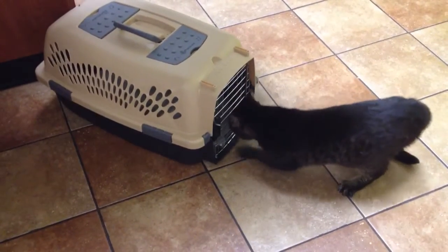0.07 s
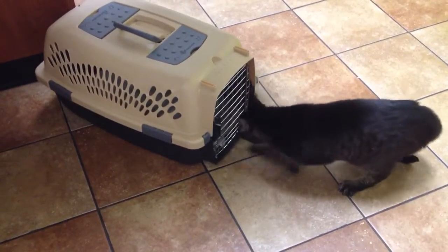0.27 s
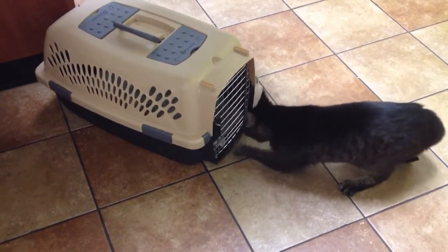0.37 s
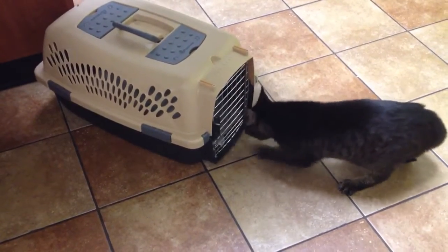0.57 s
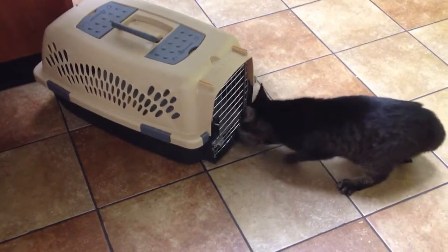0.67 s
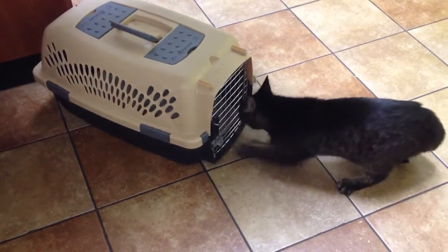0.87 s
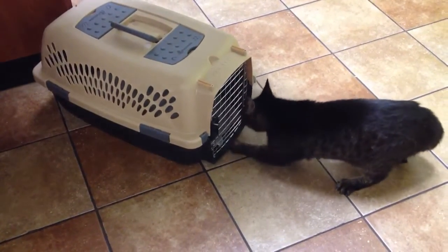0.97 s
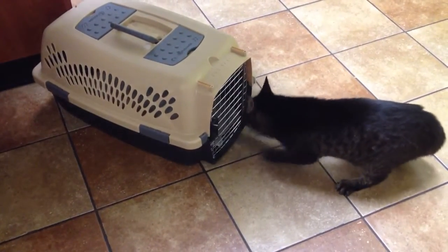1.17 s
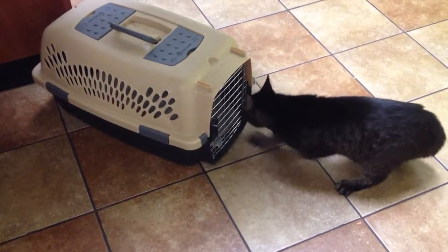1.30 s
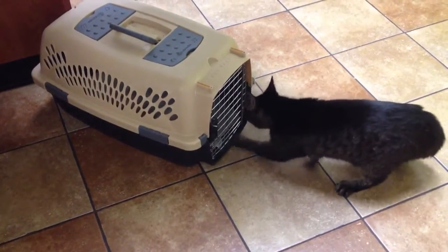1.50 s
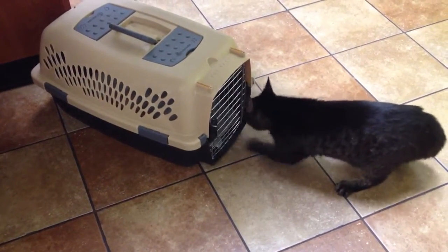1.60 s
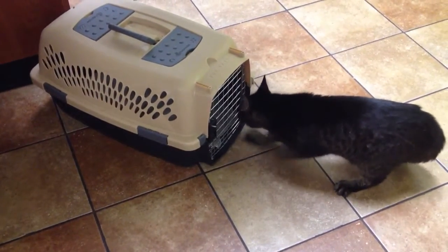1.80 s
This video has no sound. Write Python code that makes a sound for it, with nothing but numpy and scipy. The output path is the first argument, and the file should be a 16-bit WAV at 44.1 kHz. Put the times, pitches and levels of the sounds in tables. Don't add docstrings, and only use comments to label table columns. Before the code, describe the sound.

A cat nudges a carrier's wire door, making sharp metallic clacks with hollow plastic thumps in a tiled room

```python
import sys
import numpy as np
from scipy import signal
from scipy.io import wavfile

SR = 44100
rng = np.random.default_rng(int(sys.argv[2]) if len(sys.argv) > 2 else 0)


def master_out(mix):
    frames = np.transpose(np.atleast_2d(mix))
    ceiling = np.clip(frames, -1, 1)
    pcm = np.round(ceiling * 32767).astype(np.int16)
    wavfile.write(sys.argv[1], SR, pcm)


def rack_gain(trim_db):
    fader = np.asarray(trim_db, float)
    return 10 ** (fader / 20)


N = 81585
LEAD = 4410

# start_s, latch_db, frame_db, shell_db, wires_db
DOOR_KNOCKS = [(0.1407, -29.5, -47.5, -44, -37.5), (0.2001, -24.5, -48, -47, -45),
               (0.2045, -41, -41.5, -43, -42.5), (0.2421, -10, -23, -33.5, -32.5),
               (0.3254, -64, -38.5, -46.5, -53.5), (0.3955, -63, -41.5, -48, -72),
               (0.7854, -33, -40.5, -63, -53), (0.8381, -23.5, -30, -39, -43),
               (0.8466, -51, -43, -37.5, -65), (1.2804, -28, -34.5, -48, -41.5),
               (1.2897, -30, -39.5, -43, -38), (1.722, -24, -37, -44.5, -41)]
# latch_db, frame_db, shell_db, wires_db
EARLIER_KNOCK_DB = (-39, -37, -47.5, -48)
EARLIER_KNOCK_S = -0.012
# start_s, latch_db, frame_db, shell_db, wires_db
RATTLE_RUNS = [
    (.141, -46, -73, -61, -57),
    (.62, -53, -67, -69.5, -70),
    (1.172, -64, -73, -55.5, -68.5),
    (1.192, -48, -57, -54, -61.5),
    (1.292, -36, -45.5, -53.5, -49.5),
    (1.453, -49, -58.5, -70, -68),
    (1.678, -65, -63.5, -65, -70),
]
RATTLE_LENGTH_S = [0.016, .012, 0.013, .03, 0.022, 0.014, 0.017]
# start_s, level_db
BASE_THUMPS = [
    (0.148, -52),
    (.262, -40),
    (0.851, -55),
    (1.311, -47),
    (1.73, -52),
]
KNOCK_FACING_DB = [-6, -7, -5.5, -1, 1.5, -18, -1.5, -3, -2, -5, -4.5, -9]
KNOCK_BARS_DB = [-15, -11, -15, -15, -8, -10, -13, -17, -4, -6, -5.5, -4.5]
RATTLE_FACING_DB, RATTLE_BARS_DB = -6, -8

# pitch_hz, width_hz, level_db
LATCH_MODES = [(1740, 700, -10), (2156, 472, 0.5)]
# pitch_hz, width_hz, level_db
BAR_MODES = [(2570, 430, -4), (3040, 430, -1), (3645, 496, 0.5)]
# pitch_hz, width_hz, level_db
FRAME_MODES = [(605, 130, -11), (811, 147, -8), (980, 470, -23), (1458, 366, -1.5)]
# pitch_hz, width_hz, level_db
WIRE_MODES = [(4950, 620, -3.5), (5700, 620, -2), (6580, 525, -2), (7540, 560, 0), (8400, 760, 1.5),
              (11060, 910, -2.5), (11700, 630, -38), (12060, 960, 2.5), (13300, 700, -6),
              (14400, 370, -9.5)]
# pitch_hz, width_hz, level_db
SHELL_MODES = [(210, 63, -10.5), (250.7, 21.9, -2), (326.8, 26.6, -3.5), (465, 110, -3.5)]
# pitch_hz, width_hz, level_db
BASE_MODES = [(126, 25, -2.5), (163.2, 31, -1.5), (204.4, 75, -5)]
LATCH_DB, FRAME_DB, WIRES_DB, SHELL_DB = -5, 4, -0.5, 1
CONTACT_S, WIRES_CONTACT_S, SHELL_LAG_S = 0.0012, 0.004, 0.004964
SPREAD_DB = 4.5
METAL_BLUR = 1.85

# pitch_hz, t60_s
ROOM_DECAY = [(100, .5), (300, 0.3354), (1000, 0.387), (3000, 0.39), (8000, 0.36), (15000, 0.27)]
# pitch_hz, level_db
ROOM_LEVEL = [(100, -25.5), (300, -32.5), (1000, -26), (2500, -30), (5000, -31.5), (8000, -27.5),
              (15000, -33.5)]
# pitch_hz, width_hz, level_db
HUM_MODES = [(125.5, 6.7, 0.5), (158.7, 60, 8), (221.4, 60, -10.5), (239, 9.2, 0.5), (304, 60, -13),
             (414, 10, 13.5)]
# pitch_hz, density_db
HISS_SPECTRUM = [(52, 4), (100, -6), (160, 0.5), (400, -6.5), (900, -19), (2500, -16.5), (5000, -29.5),
                 (15000, -26.5)]

PORT_HZ = [7940, 9930, 12300, 15700]
PORT_WIDTH_HZ = [1630, 2950, 1500, 1990]
PORT_GAIN = [1.08, 0.086, 0.23, 0.62]


def ring(x, hz, width_hz):
    radius = np.exp(-np.pi * width_hz / SR)
    angle = 2 * np.pi * hz / SR
    return signal.lfilter([0, np.sin(angle)], [1, -2 * radius * np.cos(angle), radius ** 2], x + 1e-18)


def strike(modes, times_s, levels_db, blur, contact_s, direct_db):
    shape = len(times_s), len(modes)
    delay_s = contact_s * rng.random(shape)
    scatter_db = SPREAD_DB * rng.standard_normal(shape)
    out = np.zeros((2, N + LEAD + 900))
    for m, (hz, width_hz, mode_db) in enumerate(modes):
        force = np.zeros_like(out)
        gain = rack_gain(levels_db + mode_db)
        direct_at = ((times_s + delay_s[:, m]) * SR).astype(int) + LEAD
        around_at = (times_s * SR).astype(int) + LEAD
        np.add.at(force[0], direct_at, gain * rack_gain(direct_db + scatter_db[:, m]))
        np.add.at(force[1], around_at, gain)
        swell = ring(ring(force[0], hz, width_hz), hz, width_hz) * 2 * np.e * np.pi * width_hz / SR
        around = ring(force[1], hz, blur * width_hz)
        out += np.array([swell, around]) * (-1) ** m
    return out[:, :N + LEAD]


def touches():
    rattles = []
    for (start_s, *levels_db), length_s in zip(RATTLE_RUNS, RATTLE_LENGTH_S):
        for k in range(8):
            rattles.append((start_s + length_s * (k + rng.random()) / 8, *levels_db))
    columns = np.transpose([(EARLIER_KNOCK_S, *EARLIER_KNOCK_DB), *DOOR_KNOCKS, *rattles])
    facing_db = np.array([RATTLE_FACING_DB, *KNOCK_FACING_DB, *[RATTLE_FACING_DB] * len(rattles)])
    bars_db = np.array([RATTLE_BARS_DB, *KNOCK_BARS_DB, *[RATTLE_BARS_DB] * len(rattles)])
    return *columns, facing_db, bars_db


def latch(s, level_db, facing_db):
    return strike(LATCH_MODES, s, level_db + LATCH_DB, METAL_BLUR, CONTACT_S, facing_db)


def bars(s, latch_db, bars_db, facing_db):
    return strike(BAR_MODES, s, latch_db + LATCH_DB + bars_db, METAL_BLUR, CONTACT_S, facing_db - 2.0)


def frame(s, level_db, facing_db):
    return strike(FRAME_MODES, s, level_db + FRAME_DB, METAL_BLUR, CONTACT_S, facing_db)


def wires(s, level_db, facing_db):
    return strike(WIRE_MODES, s, level_db + WIRES_DB, METAL_BLUR, WIRES_CONTACT_S, -6.5 + facing_db / 2)


def shell(s, level_db):
    return strike(SHELL_MODES, s + SHELL_LAG_S, level_db + SHELL_DB, 1.38, CONTACT_S, -7.5)


def base():
    return strike(BASE_MODES, *np.transpose(BASE_THUMPS), 1.08, CONTACT_S, -5.5)


def carrier():
    s, latch_db, frame_db, shell_db, wires_db, facing_db, bars_db = touches()
    x = latch(s, latch_db, facing_db) + bars(s, latch_db, bars_db, facing_db)
    x += frame(s, frame_db, facing_db) + wires(s, wires_db, facing_db)
    x += shell(s, shell_db) + base()
    return signal.sosfilt(signal.butter(2, 137, "high", fs=SR, output="sos"), x)


def at_hz(points, hz):
    table_hz, values = np.transpose(points)
    return np.interp(np.log(hz), np.log(table_hz), values)


def bands(size, gain):
    white = rng.standard_normal((2, size))
    edges_hz = 28 * 2 ** np.arange(0, 9.3, 1 / 3)
    out = np.zeros(size)
    for k, (low_hz, high_hz) in enumerate(zip(edges_hz, edges_hz[1:])):
        sos = signal.butter(2, [low_hz, high_hz], "band", fs=SR, output="sos")
        out += gain(np.sqrt(low_hz * high_hz)) * signal.sosfilt(sos, white[k % 2])
    return out


def room(x):
    start_s, rise_s = 0.0013, 0.0044
    t = np.arange(SR) / SR
    tail = bands(SR, lambda hz: rack_gain(at_hz(ROOM_LEVEL, hz) - 60 * t / at_hz(ROOM_DECAY, hz)))
    onset = np.clip((t - start_s) / rise_s, 0, 1)
    return signal.fftconvolve(x, tail * onset)[:len(x)]


def rms_one(x):
    return x / np.sqrt(np.mean(x ** 2) + 1e-20)


def hiss():
    return rack_gain(-59.5) * rms_one(bands(N + LEAD, lambda hz: rack_gain(at_hz(HISS_SPECTRUM, hz))))


def hum():
    white = rng.standard_normal(N + LEAD)
    modes = sum(rack_gain(db) * rms_one(ring(white, hz, width_hz)) for hz, width_hz, db in HUM_MODES)
    return rack_gain(-67.5) * rms_one(modes)


def scene():
    direct, around = carrier()
    mix = direct + rack_gain(6.0) * room(around) + hiss() + hum()
    return mix[None, LEAD:]


def top_cut(x):
    return signal.sosfilt(signal.butter(12, 15770, fs=SR, output="sos"), x)


def record(dry):
    x = dry.copy()
    for hz, width_hz, gain in zip(PORT_HZ, PORT_WIDTH_HZ, PORT_GAIN):
        x += gain * 2 * np.pi * width_hz / SR * ring(dry, hz, width_hz)
    x = signal.sosfilt(signal.butter(3, 113.6, "high", fs=SR, output="sos"), x)
    x = signal.sosfilt(signal.ellip(8, 1, 30, 15270, fs=SR, output="sos"), x)
    return top_cut(x)


dry = scene()
out = record(dry)
master_out(out)
```